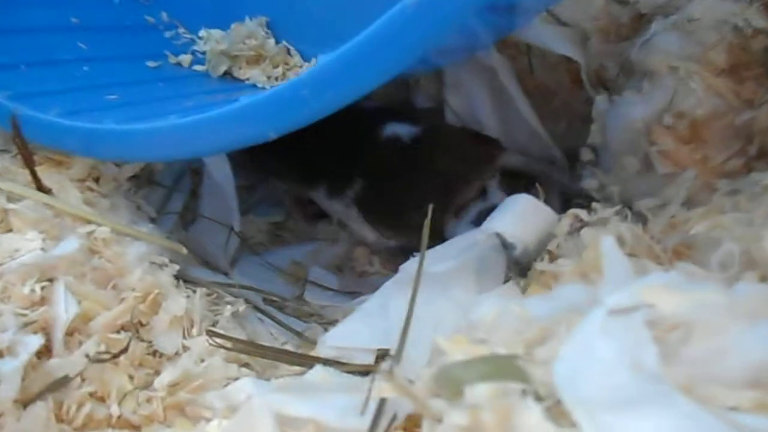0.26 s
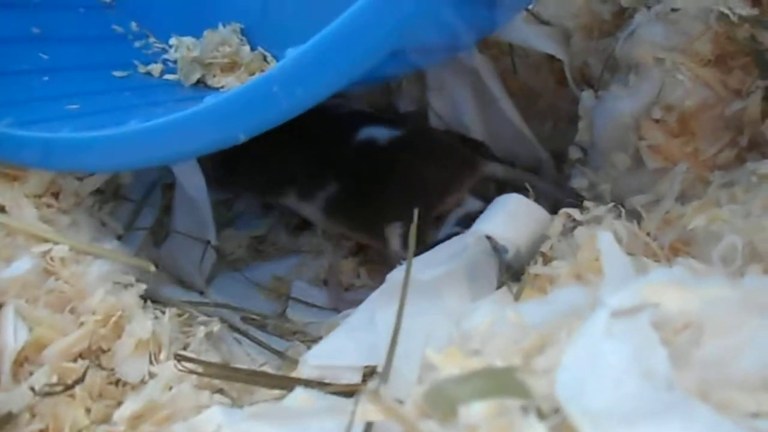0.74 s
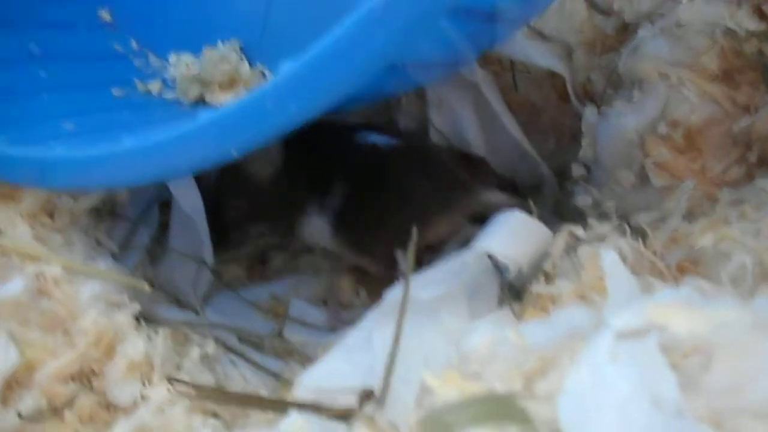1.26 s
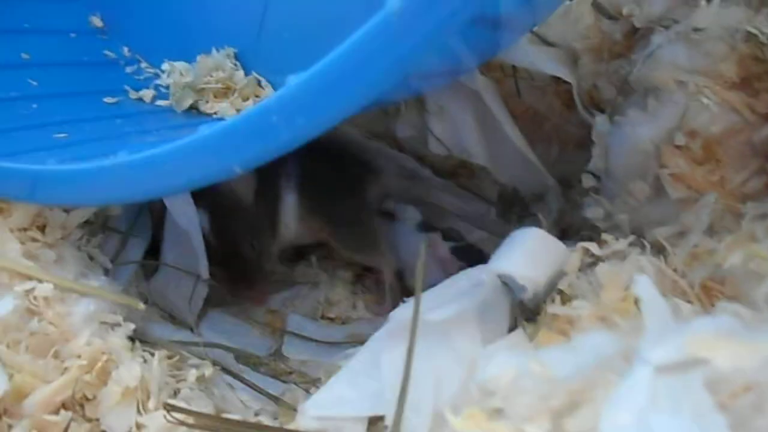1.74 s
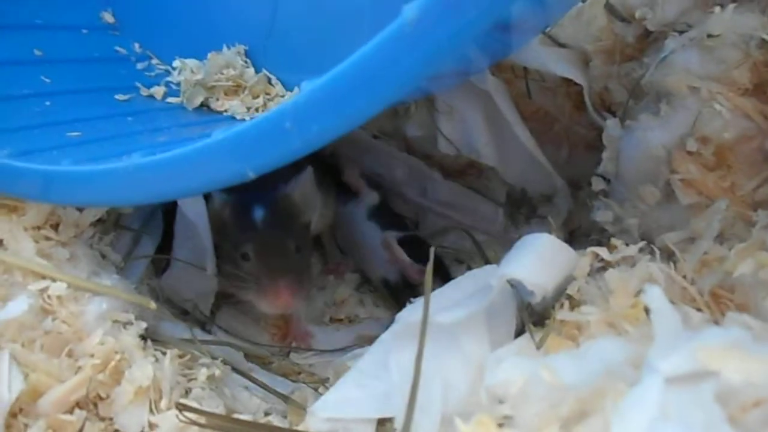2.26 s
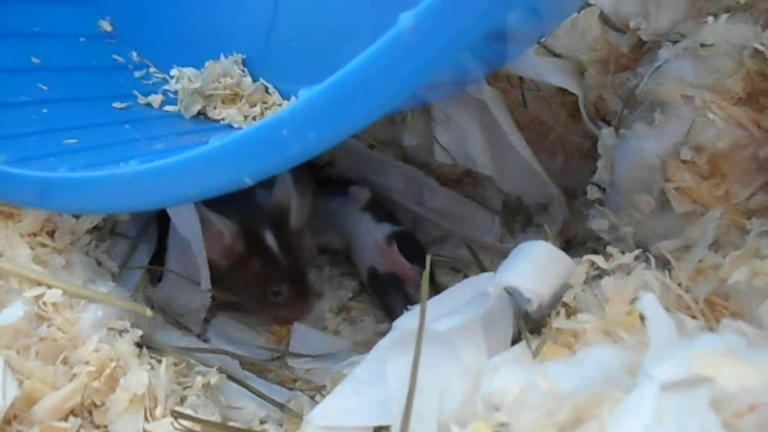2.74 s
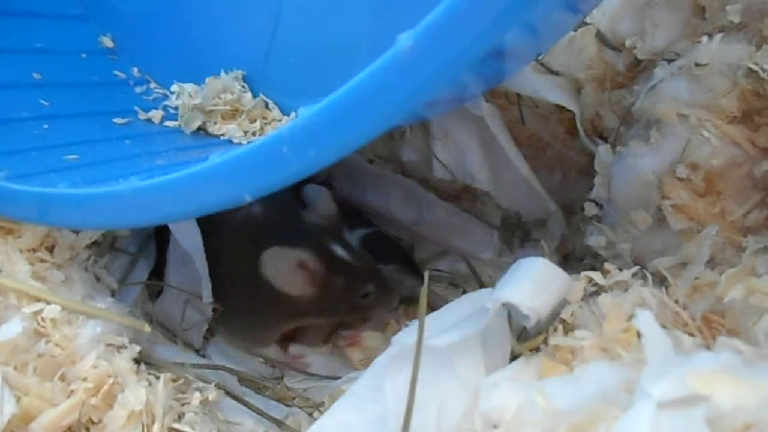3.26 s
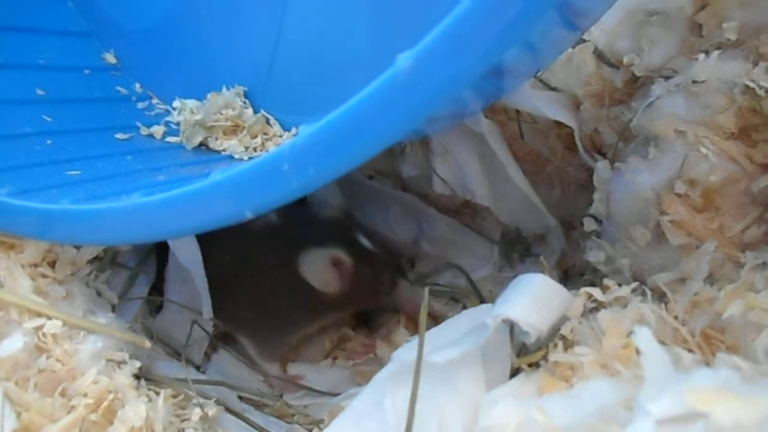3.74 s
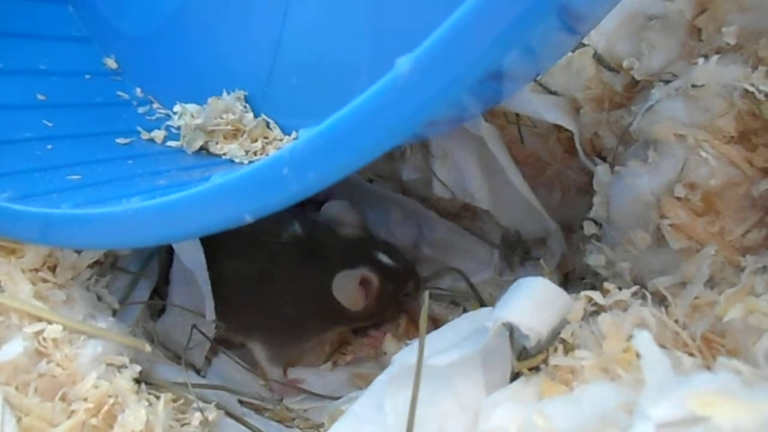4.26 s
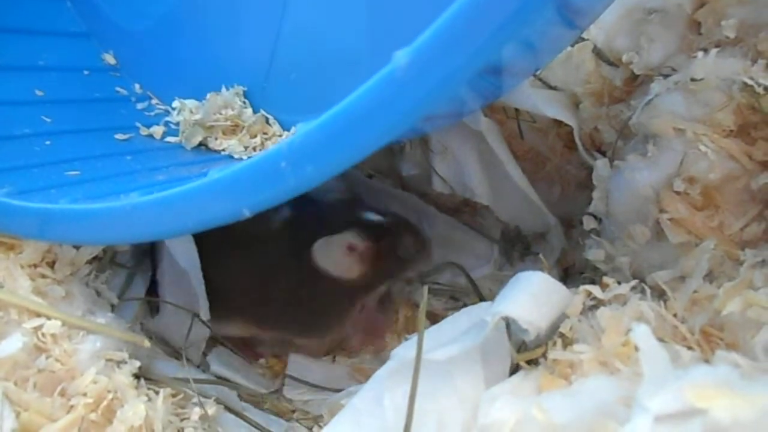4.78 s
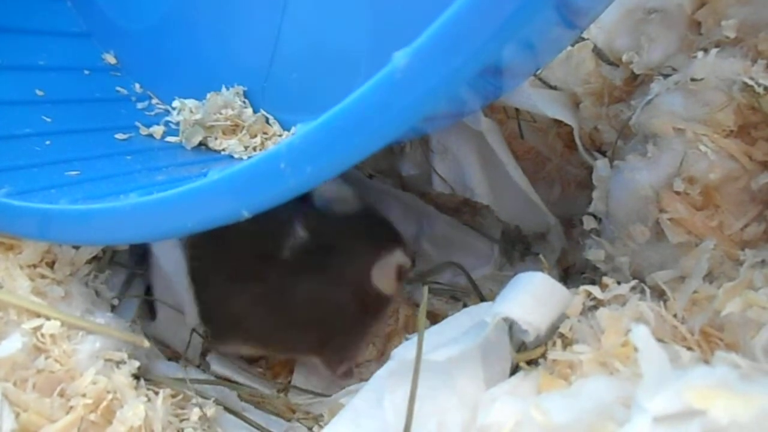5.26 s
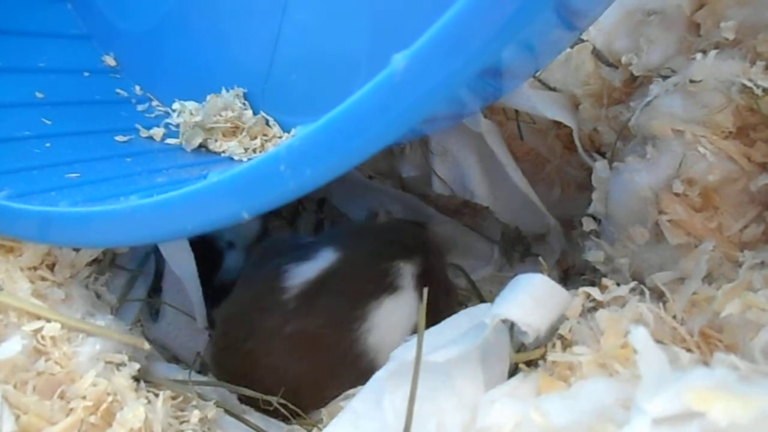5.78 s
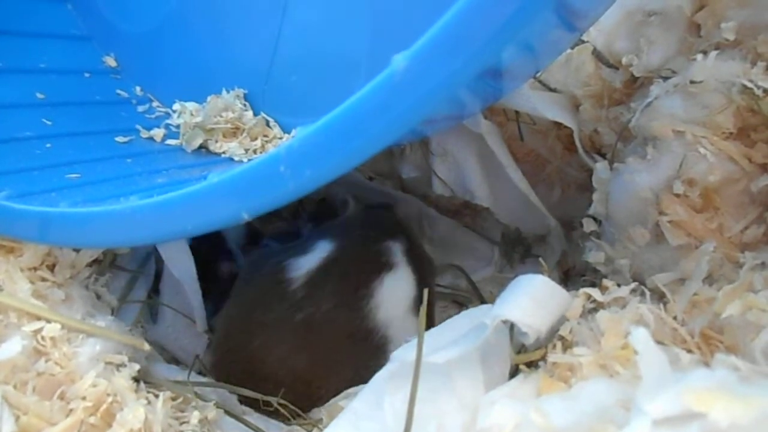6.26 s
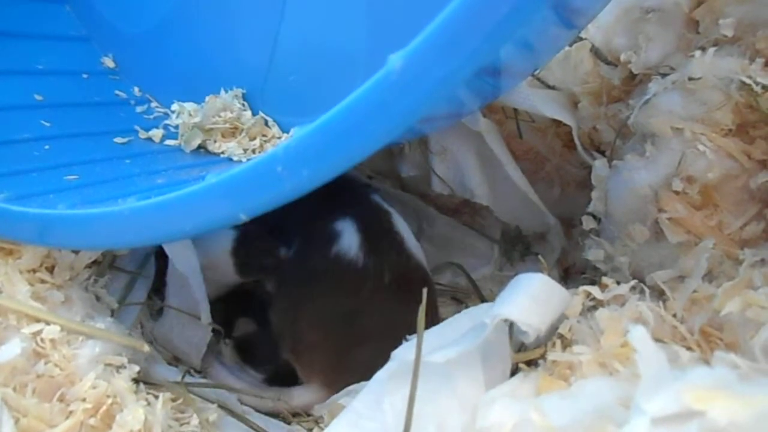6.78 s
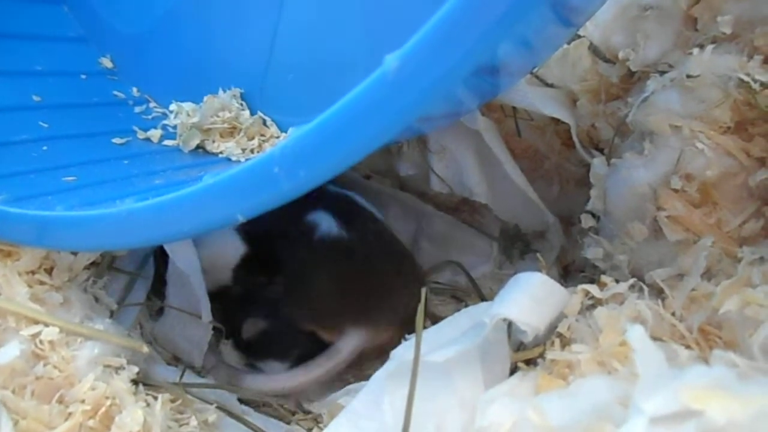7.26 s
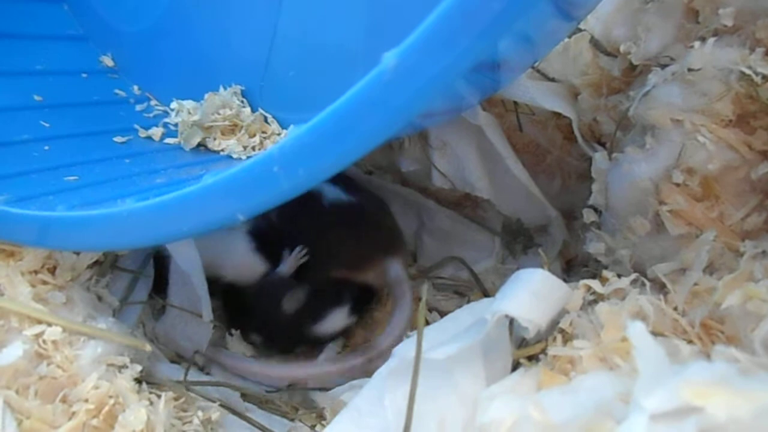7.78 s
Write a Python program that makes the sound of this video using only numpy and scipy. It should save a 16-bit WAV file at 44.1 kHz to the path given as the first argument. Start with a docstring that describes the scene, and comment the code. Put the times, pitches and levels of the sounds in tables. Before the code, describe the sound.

Close, dry crackles of paper and shavings give way to a string of short, thin mouse-pup squeaks above constant soft hiss.

```python
"""Paper rustles, scuffs and snaps as a mother mouse shifts about, over a camera's hiss and whirr; then pups squeak.
The paper is noise and sparse slips ringing broad resonances; each snap excites damped modes.
Each squeak is a gliding near sine with its octave; in the raspy stretches the folds clap shut
once every few cycles and ring the throat. The cage adds a faint echo, a low shake, thumps and a hum."""
import sys
import numpy as np
from scipy import signal
from scipy.fft import rfft, irfft
from scipy.io import wavfile
from scipy.ndimage import uniform_filter1d

SR = 44100
rng = np.random.default_rng(int(sys.argv[2]) if len(sys.argv) > 2 else 0)


def master(y):
    """Save y as 16-bit WAV."""
    cut = np.clip(np.atleast_2d(y).T, -1, 1)
    pcm = np.round(cut * 32767)  # scale
    wavfile.write(sys.argv[1], SR, pcm.astype(np.int16))


def natural_amplitude(level_db):
    """Convert a level in decibels to a linear amplitude factor, elementwise."""
    exponent = np.asarray(level_db, float) / 20
    return 10 ** exponent


N = 353682
T = np.arange(N) / SR

# spectrum of the camera hiss: [f/Hz, relative density level/dB]
HISS = [(30, -25.5), (140, -12.5), (400, -6), (800, -7), (1400, -7.5), (2200, -5), (4500, -7.5),
        (7000, -10.5), (10500, -22.5)]
# camera drive: [f/Hz, width/Hz, level/dB]
WHIRR = [(1015, 40, -72)]
# low hum that swells and fades: [t/s, level/dB]
HUM = [(0, -73.5), (1.1, -71.5), (1.3, -68), (1.75, -64), (2.3, -77), (3.2, -87)]
# the paper's low, middle and high resonances: [f/Hz, width/Hz]
PAPER = [(1000, 650), (3500, 1300), (7100, 1800)]
# rustle of the nest: [t/s, level of the low resonance/dB, tilt from one resonance to the next/dB]
RUSTLE = [(0, -59.5, -0.5), (.2, -52, -3.5), (.45, -55.5, -3), (.7, -56.5, -12), (.95, -57.5, -1.5),
          (1.1, -60, -25), (1.75, -59, -4), (2.3, -66, -7), (3.5, -65, -6), (4.3, -68, -14),
          (4.65, -63.5, -2), (5.3, -63.5, -5), (7.1, -73, -33), (7.6, -64.5, -2.5), (8.02, -61, -8.5)]
# short drags of paper on paper: [start t/s, nominal length/s, middle level/dB, high level/dB]
SCUFFS = [(0.014, 0.015, -49, -50), (0.473, 0.012, -59, -41), (0.505, 0.0056, -45, -41.5),
          (0.576, 0.018, -46.5, -35), (0.626, 0.011, -44, -33.5), (0.679, 0.0093, -43.5, -30.5),
          (0.757, 0.012, -46.5, -31), (0.834, 0.02, -45, -39.5), (0.897, 0.012, -46, -35.5),
          (0.923, 0.083, -64, -62), (1.047, 0.011, -59, -46.5), (1.187, 0.24, -60, -63.5),
          (1.345, 0.022, -56, -50), (1.416, 0.21, -62, -62.5), (1.479, 0.035, -46.5, -52),
          (1.547, 0.067, -41, -51), (1.613, 0.12, -45, -59), (1.655, 0.045, -50.5, -60),
          (1.987, 0.023, -58, -50), (2.023, .12, -51.5, -47.5), (2.191, 0.0074, -52, -39),
          (2.234, 0.013, -47.5, -46), (5.46, 0.26, -61.5, -67), (6.446, 0.15, -62, -70),
          (6.551, 0.067, -58.5, -70)]
# snaps of creased paper and shavings: [t/s, peak level of the sheet modes/dB, level of the low part/dB]
SNAPS = [(0.4628, -32.5, -41.5), (0.6218, -32.5, -45), (0.8118, -32, -42.5), (0.8907, -27.5, -43.5),
         (0.922, -33, -45.5), (1.051, -26, -38), (1.1504, -28.5, -35), (1.3508, -24.5, -41),
         (1.49, -52, -32), (1.5496, -14.5, -27), (1.8194, -13.5, -27.5), (1.916, -15, -24.5),
         (2.0095, -35, -35.5), (2.0334, -28, -57), (2.056, -29, -47), (2.0764, -31, -40),
         (2.0965, -29.5, -40.5), (2.2039, -30.5, -42.5), (2.2308, -29, -37.5), (2.2436, -44, -34),
         (2.4039, -25.5, -40), (2.408, -45, -39), (2.4928, -37.5, -55), (2.5939, -39, -56),
         (2.609, -28.5, -38.5), (2.765, -40, -52), (2.7779, -34.5, -38), (3.0885, -38.5, -58),
         (3.3973, -34.5, -47.5), (3.4594, -42, -35), (4.573, -34, -50), (4.9597, -39.5, -65),
         (5.526, -47, -41.5), (5.545, -34, -54), (7.815, -35, -43)]
# mean modes of a snapping sheet: [f/Hz, relative level/dB, t60/s]
SHEET_MODES = [(1815, 8, 0.0088), (2560, 12.5, 0.0034), (4020, 6.5, 0.026), (4770, 11.5, 0.0049),
               (7020, 5.5, 0.019), (9400, -23, .008)]
# mean modes of a snap's low part: [f/Hz, relative level/dB, t60/s]
KNOCK_MODES = [(422, -20.5, 0.11), (732, -2, 0.037), (1037, 5, 0.012)]
# squeaks: [start t/s, length/s, first f/Hz, top f/Hz, last f/Hz, top level/dB, swell up to it/dB]
SQUEAKS = [(2.363, 0.047, 4504, 4810, 4450, -43, 1), (2.513, 0.076, 4530, 4960, 4150, -47, 1),
           (2.692, 0.053, 4880, 4957, 4600, -43, 4.5), (2.853, 0.022, 4690, 4690, 4550, -41.5, 17),
           (2.98, 0.041, 4724, 4790, 4590, -38, 6), (3.127, .07, 4853, 4956, 4560, -43.5, 9),
           (3.291, 0.05, 4540, 4686, 4490, -33, 4.5), (3.436, 0.079, 4773, 4955, 4510, -40.5, 1),
           (3.585, 0.08, 4630, 4750, 4510, -46, 13), (3.751, 0.072, 4300, 4873, 4470, -41.5, 13),
           (3.913, 0.069, 4735, 5050, 4610, -39.5, 7), (4.191, 0.03, 4640, 4670, 4400, -39, 6),
           (4.452, 0.0059, 4700, 4570, 4570, -42, 1), (4.789, 0.085, 4740, 4650, 4040, -42.5, -1),
           (4.98, .06, 4720, 4786, 4180, -44, -4), (5.126, 0.069, 4770, 4740, 4640, -39.5, 1.5),
           (5.423, 0.053, 4640, 4700, 4210, -39.5, -2), (5.726, 0.043, 4840, 4680, 3920, -45, -8.5),
           (6.032, 0.0019, 4240, 4350, 4230, -36.5, 8), (7.4912, 0.038, 4900, 4605, 4360, -33.5, 4.5),
           (7.656, 0.025, 4714, 4595, 4480, -35, -4), (7.888, 0.08, 4830, 4970, 4480, -39, -1.5)]
# raspy stretches: [start t/s, end t/s, cycles from clap to clap, unevenness 0-1, clap level before the rasp gain/dB]
RASPS = [(2.361, 2.402, 7, .4, -46.5), (2.51, 2.574, 11, .25, -50), (2.695, 2.728, 9, .35, -50),
         (2.849, 2.865, 9, .3, -53.5), (2.981, 3.012, 7, .4, -47), (3.132, 3.17, 8, .4, -48.5),
         (3.291, 3.33, 4, .14, -45), (3.433, 3.494, 7, .35, -48), (3.59, 3.635, 8, .3, -49),
         (3.635, 3.652, 5, .05, -50), (3.748, 3.77, 3, .12, -44), (3.77, 3.808, 5, .2, -47.5),
         (3.914, 3.934, 8, .25, -49), (3.934, 3.948, 5, 0, -45), (3.952, 3.963, 9, .3, -52),
         (4.188, 4.21, 9, .35, -52.5), (4.803, 4.834, 4, .12, -52), (4.834, 4.852, 3, 0, -46),
         (4.852, 4.862, 4, .1, -51.5), (4.998, 5.018, 5, .5, -57), (5.127, 5.172, 5, .5, -54),
         (7.492, 7.514, 4, .22, -43.5), (7.514, 7.53, 4, 0, -44.5), (7.886, 7.955, 5, .22, -47)]
# throat resonances: [f/Hz, width/Hz, relative level/dB]
THROAT = [(1350, 1100, -8), (2900, 1200, -14), (5600, 1000, 1), (7500, 1500, -11), (10000, 1600, -10)]

HISS_DB = -60.5  # rms
# thump of the cage floor; its level is relative to the snap's low part
THUMP_HZ, THUMP_T60_S, THUMP_DB = 51.4, 0.11, -36.5
# small snaps: mean wait, least level over the rustle, mean excess, low part under the peak
SMALL_WAIT_S, SMALL_DB, SMALL_SCATTER_DB, SMALL_LOW_DB = .06, 15, 2.5, -20.5
OCTAVE_DB = -16.5  # relative to the fundamental, outside the raspy stretches
# as the breath runs out the pitch drops ever faster and the tone fades
FALL_HZ_PER_S, FALL_BEND, RISE_BEND = 26000, 2.4, .6
FADE_S, FADE_DB = .007, -3
# wavering of the tone: share of the pitch, level, changes per second
WAVER, WAVER_DB, WAVER_PER_S = .008, 1.2, 70
CHOKE_DB_PER_CYCLE = -.5  # the longer the wait between claps, the weaker the tone
RASP_GAIN_DB = 9.5
TYPICAL_HZ = 4700  # pitch used to turn cycles into seconds


def level(x, db):
    """Root-mean-square normalisation to a stated level."""
    return x * natural_amplitude(db) / np.sqrt(np.mean(x ** 2))


def band(x, hz, width):
    """Simple resonance: a two-pole filter with gain 1 at the centre."""
    return signal.lfilter(*signal.iirpeak(hz, hz / width, fs=SR), x)


def clicks(at_s, size):
    """Band-limited impulses: a windowed sinc places each click between samples."""
    at = np.asarray(at_s)[:, None] * SR
    index = np.clip(np.floor(at) + np.arange(-5, 7), 0, N - 1)
    pulse = np.sinc(index - at) * np.sinc((index - at) / 6)
    out = np.zeros(N)
    np.add.at(out, index.astype(int), np.asarray(size)[:, None] * pulse)
    return out


def gate(start, end, rise, fall):
    """Amplitude gating: the slice and envelope of a stretch with straight ramps."""
    span = slice(int(start * SR), min(int((end + fall) * SR), N))
    ramps = np.minimum((T[span] - start) / rise, (end + fall - T[span]) / fall)
    return span, np.clip(ramps, 0, 1)


def ring(modes):
    """Modal superposition: exponentially damped sines over 50 ms, scaled to peak 1."""
    t = T[:SR // 20]
    y = sum(natural_amplitude(db) * np.sin(2 * np.pi * hz * t) * natural_amplitude(-60 * t / t60) for hz, db, t60 in modes)
    return y / np.abs(y).max()


def crackle(rate, scatter_db):
    """Stick-slip friction: random fibre slips of unequal size over a soft hiss, rms 1."""
    size_db = np.minimum(scatter_db * rng.exponential(size=N), 4 * scatter_db)
    slips = (rng.random(N) < rate / SR) * rng.choice([-1, 1], N) * natural_amplitude(size_db)
    return level(level(slips, 0) + .45 * rng.standard_normal(N), 0)


def walk(rate):
    """Slow random modulation: levels held 1 / rate s and slewed twice, spread near 1."""
    k = int(SR / rate)
    steps = np.repeat(rng.standard_normal(N // k + 1), k)
    return 1.3 * uniform_filter1d(uniform_filter1d(steps, k), k)[:N]


def camera():
    """Stationary noise: coloured hiss of the electronics and a narrow-band, wavering whirr."""
    hz, db = np.transpose(HISS)
    bins_hz = np.arange(N // 2 + 1) * SR / N
    colour = natural_amplitude(np.interp(np.log(bins_hz + 1), np.log(hz), db))
    hiss = level(irfft(rfft(rng.standard_normal(N)) * colour, N), HISS_DB)
    whirr = sum(level(band(rng.standard_normal(N), f, w), db) for f, w, db in WHIRR)
    return hiss + whirr


def rumble():
    """Structure-borne sound: the cage floor shakes with the rustle and thumps under snaps, beside a hum."""
    s, rustle_db = np.transpose(RUSTLE)[:2]
    shake = level(band(crackle(44, 1.7), 110, 200), -19.0) * natural_amplitude(np.interp(T, s, rustle_db))
    hum = level(band(band(rng.standard_normal(N), 345, 150), 374, 280), 0)
    hum = hum * natural_amplitude(np.interp(T, *np.transpose(HUM)))
    s, _, low_db = np.transpose(SNAPS)
    blows = clicks(s, natural_amplitude(low_db + THUMP_DB))
    thumps = signal.fftconvolve(blows, ring([(THUMP_HZ, 0, THUMP_T60_S)]))[:N]
    return shake + thumps + hum


def paper():
    """Friction-driven resonance: fibre slips ring three resonances, in a lasting rustle and short drags."""
    # larger slips reach all three resonances at once
    shared = crackle(700, 3.5)
    slips = [crackle(2500, 3) + 1.1 * shared for _ in PAPER]
    bands = []
    for x, (f, w) in zip(slips, PAPER):
        peak = band(band(x, f, w), f, 2 * w)
        skirt = 0.64 * band(x, 0.86 * f, 2.77 * w)
        bands.append(level(peak + skirt, 0))
    s, db, tilt_db = np.transpose(RUSTLE)
    gain = [natural_amplitude(np.interp(T, s, db + k * tilt_db)) for k in range(len(PAPER))]
    for start, length, middle_db, high_db in SCUFFS:
        span, env = gate(start, start + 0.6 * length, 0.0039 + 0.045 * length, 0.47 * length + 0.0055)
        for g, scuff_db in zip(gain, (middle_db - 10.0, middle_db, high_db)):
            g[span] += natural_amplitude(scuff_db) * env
    return sum(g * x for g, x in zip(gain, bands))


def small_snaps():
    """Poisson process: rows like the listed snaps at random moments, their level following the rustle."""
    chance = rng.exponential(size=(int(T[-1] / SMALL_WAIT_S), 2))
    at = np.cumsum(SMALL_WAIT_S * chance[:, 0])
    rustle_db = np.interp(at, *np.transpose(RUSTLE)[:2])
    db = rustle_db + SMALL_DB + SMALL_SCATTER_DB * chance[:, 1]
    return list(np.transpose([at, db, db + SMALL_LOW_DB])[at < T[-1]])


def vary(modes, mix):
    """Modal perturbation: shifts each mode's pitch and level by its own random draw."""
    return [(hz * (1 + .04 * a), db + 4 * b, t60) for (hz, db, t60), (a, b) in zip(modes, mix)]


def snaps():
    """Impulsive excitation: a noise crack rings the modes in its own mix, with a rattle gone by 26 ms."""
    out = np.zeros(N + SR // 20)
    t = T[:SR // 20]
    for s, peak_db, low_db in SNAPS + small_snaps():
        mix = rng.standard_normal((8, 2))
        noise = rng.standard_normal(len(t))
        crack = band(noise, 2300, 2500) * natural_amplitude(-4.0 - 2900 * t)
        rattle = band(noise, *PAPER[1]) + band(noise, *PAPER[2])
        rattle = rattle * natural_amplitude(-28.0 - 120 * t) * np.clip((.026 - t) / 0.0064, 0, 1)
        sheet = ring(vary(SHEET_MODES, mix)) + crack + rattle
        knock = ring(vary(KNOCK_MODES, mix))
        out[int(s * SR):][:len(t)] += natural_amplitude(peak_db) * sheet + natural_amplitude(low_db) * knock
    return out[:N]


def squeak(start, length, first_hz, top_hz, last_hz, db, swell_db):
    """Frequency glide: span, pitch and amplitude rise or fall to the top values, then drop and fade."""
    span, env = gate(start - .001, start + length, 0.00098, .002)
    t = T[span] - start
    fall = min(abs(top_hz - last_hz) / FALL_HZ_PER_S, .7 * length)
    rise = np.clip(t / (length - fall), 0, 1) ** RISE_BEND
    drop = np.clip((t - length) / fall + 1, 0, 1) ** FALL_BEND
    hz = first_hz + (top_hz - first_hz) * rise + (last_hz - top_hz) * drop
    # the pitch scoops up in the first milliseconds
    hz *= 1 - .08 * np.exp(-(t + .001) / .002)
    fade = min(FADE_S, length / 2)
    tone_db = np.interp(t, [0, length - fade, length], [db - swell_db, db, db + FADE_DB])
    return span, hz, np.sqrt(2) * env * natural_amplitude(tone_db)  # rms level to sine peak


def clap_beats(start, end, every, uneven, chance, cycles):
    """Subharmonic locking: the cycle counts at which the folds clap, a whole number of cycles apart."""
    # the wait drifts over a few claps, so side tones waver rather than blur
    drift = np.clip(1.5 * uniform_filter1d(chance, size=2), -1.5, 1.5)
    # uneven claps start slowly and speed up through the stretch
    elapsed = np.arange(len(drift)) * every / (TYPICAL_HZ * (end - start))
    drift += np.maximum(1 - 2 * elapsed, -1)
    gaps = np.maximum(np.round(every * np.exp(uneven * drift)), 2)
    return np.round(np.interp(start, T, cycles)) + np.cumsum(gaps) - gaps[0]


def throat(claps):
    """Source-filter principle: the claps ring the throat's resonances, in alternating polarity."""
    # air hisses through the gap for a moment after each clap
    breath = .08 * rng.standard_normal(N) * signal.lfilter([1], [1, -.95], np.abs(claps))
    source = claps + breath
    return -sum((-1) ** k * natural_amplitude(db) * band(band(source, f, w), f, 2 * w)
                for k, (f, w, db) in enumerate(THROAT))


def pups():
    """Whistle with subharmonic modulation: tone and octave, plus claps locked to the tone's cycles."""
    hz, tone, octave = np.full(N, float(TYPICAL_HZ)), np.zeros(N), np.zeros(N)
    for row in SQUEAKS:
        span, pitch, size = squeak(*row)
        hz[span], tone[span], octave[span] = pitch, size, size * natural_amplitude(OCTAVE_DB)
    cycles = np.cumsum(hz * (1 + WAVER * walk(WAVER_PER_S))) / SR
    claps, swell = np.zeros(N), np.ones(N)
    for start, end, every, uneven, db in RASPS:
        chance = rng.standard_normal((128, 2))
        beats = clap_beats(start, end, every, uneven, chance[:, 0], cycles)
        at = np.interp(beats, cycles, T)
        # rarer claps are stronger, which holds their mean power
        size = natural_amplitude(db + 4 * uneven * chance[:, 1]) * np.sqrt(SR * every / TYPICAL_HZ)
        claps += clicks(at[at < end], size[at < end])
        # the tone swells towards each clap and is choked half way to the next, most deeply early on
        span = slice(int(start * SR), int(end * SR))
        depth = np.clip(.16 * (every - 2.5), .2, .9) * (1 - .5 * (T[span] - start) / (end - start))
        clap_phase = 2 * np.pi * np.interp(cycles[span], beats, np.arange(len(beats)))
        swell[span] = 1 + depth * np.cos(clap_phase)
        swell[span] *= natural_amplitude(CHOKE_DB_PER_CYCLE * every)
        # the choked folds lose part of their octave
        octave[span] *= natural_amplitude(-3)
    rasp = throat(claps)
    phase = 2 * np.pi * cycles
    whistle = tone * np.sin(phase) + octave * np.sin(2 * phase)
    return swell * natural_amplitude(WAVER_DB * walk(WAVER_PER_S)) * whistle + natural_amplitude(RASP_GAIN_DB) * rasp


def scene():
    """Superposition: nest sounds with a faint diffuse echo from the cage walls, over rumble and camera noise."""
    nest = pups() + paper() + snaps()
    # the tiny microphone port passes little of the nest's bass
    nest = signal.sosfilt(signal.butter(2, 380, "high", fs=SR, output="sos"), nest)
    t = T[:SR // 3]
    # the echo starts after 4 ms, builds up over 30 ms and decays with a t60 of 0.28 s
    walls = rng.standard_normal(len(t)) * natural_amplitude(-60 * t / .28) * np.clip((t - .004) / .03, 0, 1)
    echo = signal.fftconvolve(nest, walls / np.sqrt(np.sum(walls ** 2)))[:N]
    return (nest + natural_amplitude(-29.5) * echo + rumble() + camera())[None]


def roll_off(x):
    """The treble ends steeply here."""
    return signal.sosfilt(signal.butter(12, 12490, fs=SR, output="sos"), x)


def record(dry):
    """Aliasing at half rate: the top rolls off near 10 kHz and a faint mirror image stays above the fold."""
    direct = signal.sosfilt(signal.cheby2(11, 46, 11000, fs=SR, output="sos"), dry)
    # alternating signs mirror the spectrum about a quarter of the sample rate
    flipped = dry * (-1.) ** np.arange(N)
    mirror = signal.sosfilt(signal.butter(3, [11350, 12100], "band", fs=SR, output="sos"), flipped)
    mix = direct + natural_amplitude(-25.0) * mirror
    return roll_off(mix)


dry = scene()
out = record(dry)
master(out)
```